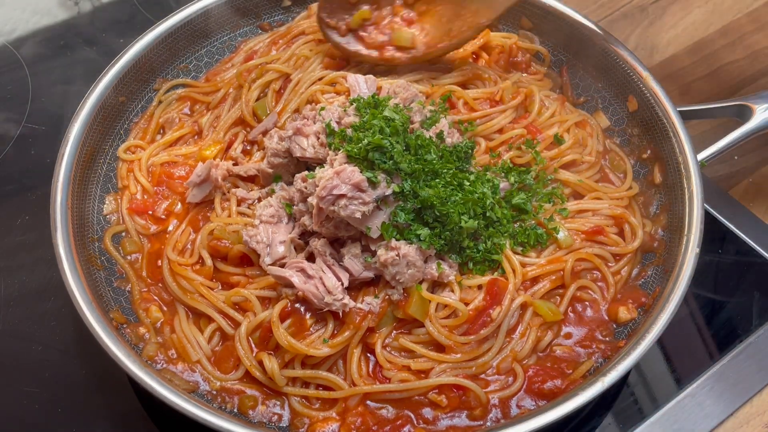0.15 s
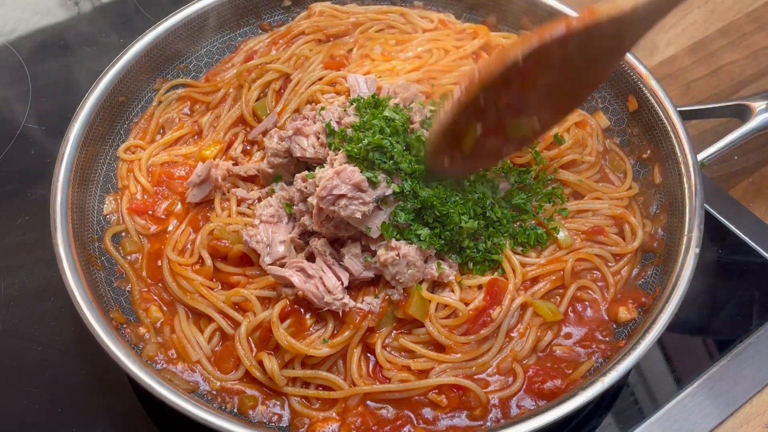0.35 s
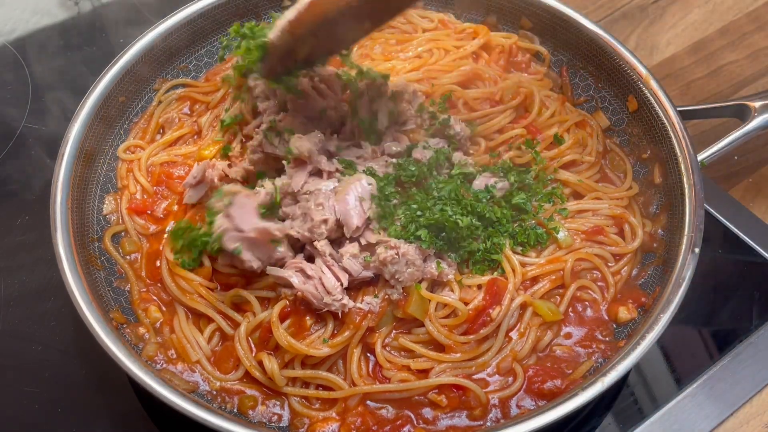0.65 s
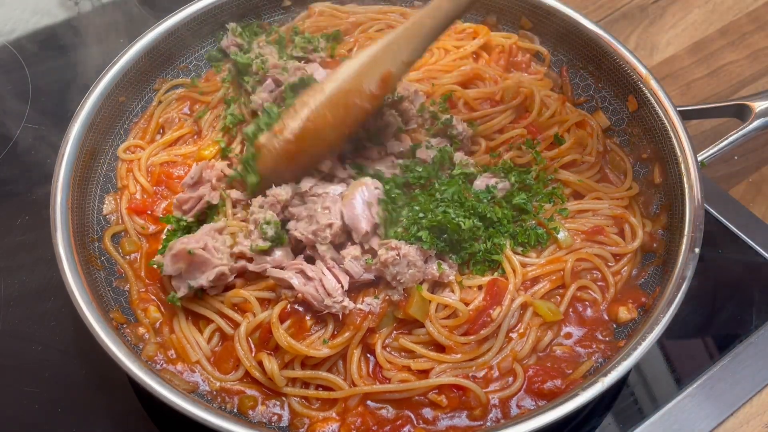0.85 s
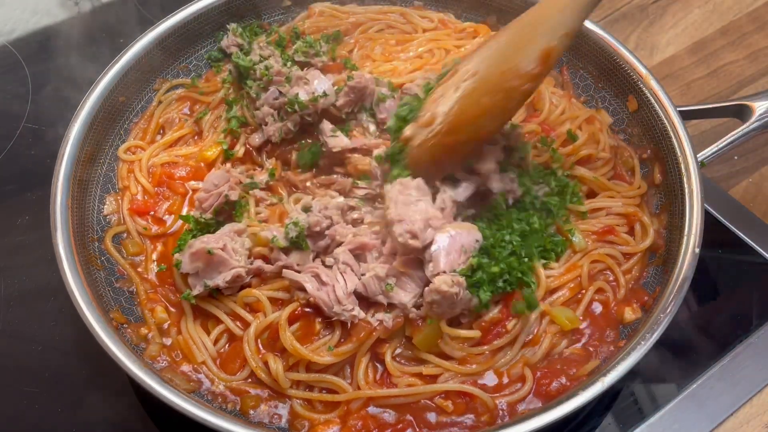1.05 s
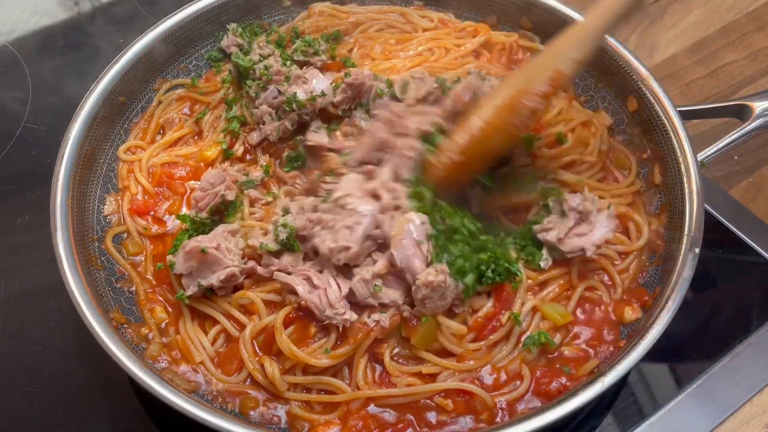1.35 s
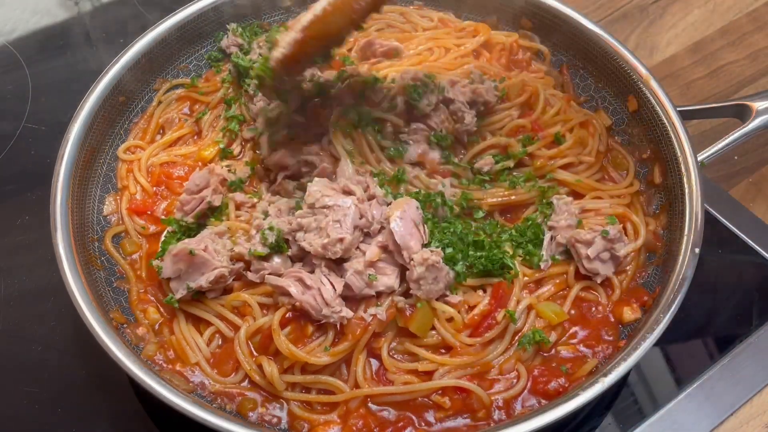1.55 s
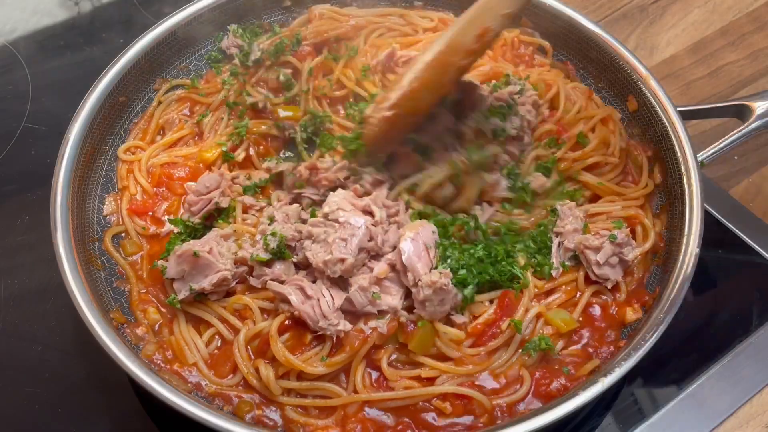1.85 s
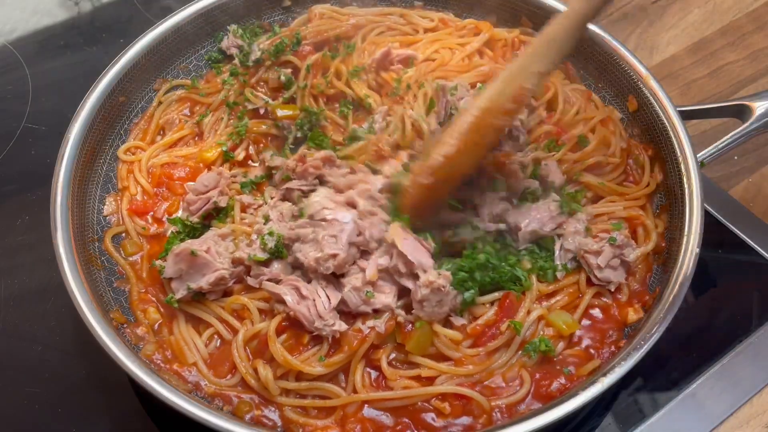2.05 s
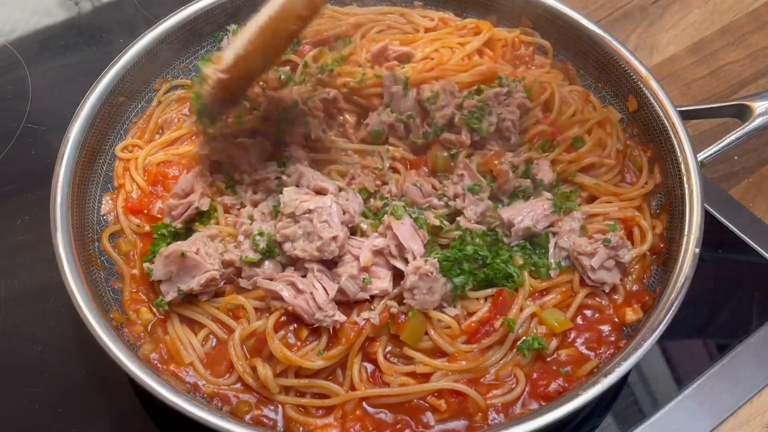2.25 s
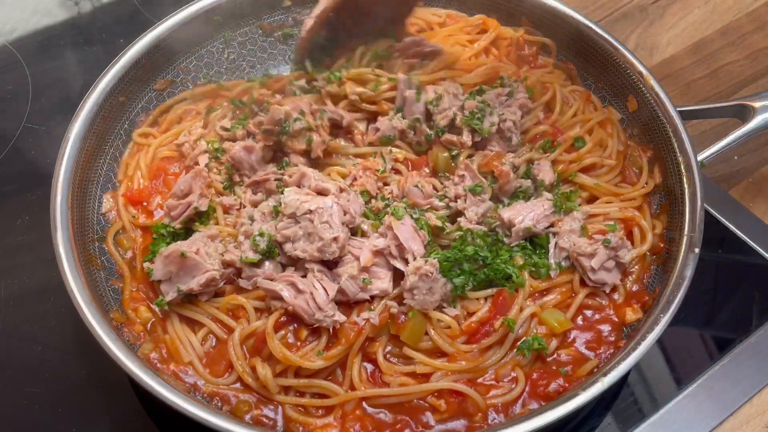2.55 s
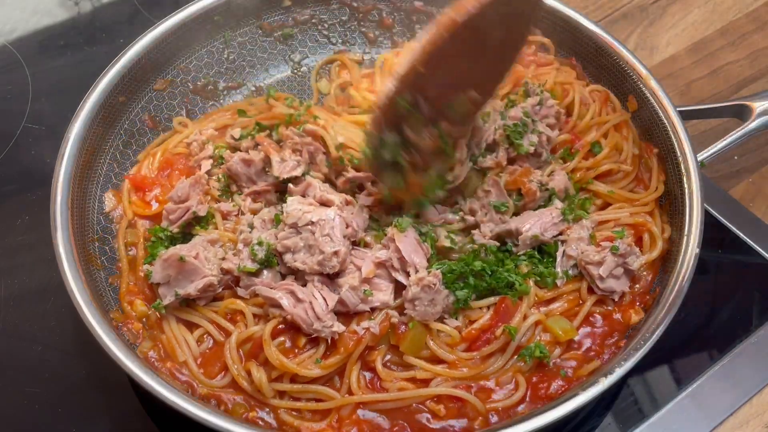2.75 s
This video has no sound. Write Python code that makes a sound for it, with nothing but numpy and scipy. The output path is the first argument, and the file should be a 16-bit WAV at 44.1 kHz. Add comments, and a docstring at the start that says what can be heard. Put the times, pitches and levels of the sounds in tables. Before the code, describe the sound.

Close up in a kitchen, pasta is stirred with wet, sticky strokes while the sauce sizzles and bubbles. A deep thump comes from the stove, followed by one sharp wooden knock that makes the metal pan ring.

```python
"""A wooden spoon stirs pasta in simmering sauce, in a steel pan on a glass hob.
The strokes squelch and the sauce hisses (both shaped noise), bubbles pop as tiny fading tones,
and sticky noodles smack. The hob rumbles, and shudders under a hard push. Once, the spoon knocks
the rim and the pan rings. A phone with two microphone ports hears it all from close by."""
import sys
import numpy as np
from scipy import signal
from scipy.fft import rfft, irfft, next_fast_len
from scipy.io import wavfile
from scipy.ndimage import uniform_filter1d, map_coordinates

SR = 44100
rng = np.random.default_rng(int(sys.argv[2]) if len(sys.argv) > 2 else 0)


def generate_wav(sig):
    """Save sig (samples, or channels by samples) to the path in sys.argv[1] as 16-bit PCM at SR."""
    pcm = np.round(np.clip(np.atleast_2d(sig).T, -1, 1) * 32767).astype(np.int16)
    wavfile.write(sys.argv[1], SR, pcm)


N = 127890


def amp(db):
    return 10 ** (np.asarray(db) / 20)


def unit(x):
    return x / np.sqrt(np.mean(x ** 2) + 1e-20)


def along(points, hz):
    """Read between (Hz, value) points on a log frequency scale."""
    f, v = np.transpose(points)
    return np.interp(np.log(hz + 1), np.log(f + 1), v)


def curves(rows):
    """One value per sample for each column after the time."""
    s, *cols = np.transpose(rows)
    return [np.interp(np.arange(N) / SR, s, c) for c in cols]


def wobble(rate):
    """A smooth curve through rate random values a second."""
    return map_coordinates(rng.standard_normal(int(N * rate / SR) + 4), [np.arange(N) * rate / SR])


def filtered(x, response):
    """Scale and shift each frequency of x by response(hz)."""
    m = next_fast_len(N + SR // 2)
    return irfft(rfft(x, m) * response(np.fft.rfftfreq(m, 1 / SR)), m)[..., :N]


def bursts(rows, shape):
    """A loudness curve with one copy of shape at each (seconds, dB) row."""
    hits = np.bincount([round(s * SR) for s, _ in rows], [amp(db) for _, db in rows], N)
    return np.convolve(hits, shape)[:N]


def fading_noise(table):
    """Stereo noise above 200 Hz; each frequency has its own fade time (time to drop 60 dB)."""
    f, db, t60 = np.transpose(table)
    hz, t, z = signal.stft(rng.standard_normal((2, SR // 2 + 256)), SR, nperseg=256)
    gain_db = along(np.c_[f, db], hz)[:, None] - 60 * t / along(np.c_[f, t60], hz)[:, None]
    return signal.istft(z * amp(gain_db) * (hz > 200)[:, None], SR, nperseg=256)[1][:, :SR // 2]


# How wide the noise sounds. Each row: frequency in Hz, side level over the middle in dB.
STEREO_WIDTH = [(60, -19), (130, -2.5), (250, -6.5), (700, -3), (1300, -5), (4400, -5), (8500, 1)]
def rush(spectrum, grit_db, spikes, patchy_db):
    """Patchy stereo noise of a set strength, made gritty by short spikes of loudness."""
    kicks = np.bincount(rng.integers(0, N, spikes), rng.exponential(1, spikes), N)
    grit = 1 + amp(grit_db) * np.convolve(kicks, np.exp(-np.arange(SR // 100) / (0.0016 * SR)))[:N]
    z = signal.stft(rng.standard_normal((2, N + 256)), nperseg=256)[2]
    patches = uniform_filter1d(rng.standard_normal(z.shape[1:]), size=5, axis=0)
    patches = uniform_filter1d(patches, size=8, axis=1)
    pair = signal.istft(z * amp(patchy_db * unit(patches)), nperseg=256)[1][:, :N]
    mid, side = filtered(grit * pair, lambda hz: amp(along(spectrum, hz)))
    side = filtered(side, lambda hz: amp(np.clip(along(STEREO_WIDTH, hz), -25, 0)))
    return np.array([mid + side, mid - side]) / np.std(mid)


def hollow_pan(hz, boost_db=14, width_hz=40):
    """The pan, damped by food, boosts sound near its own ringing notes."""
    damping = 1j * hz * width_hz
    peaks = sum(amp(db) * damping / (note ** 2 - hz ** 2 + damping) for note, db, *_ in PAN_NOTES[2:])
    return 1 + amp(boost_db) * peaks


# The spoon's strokes. Each row: time in seconds, then squelch, sizzle and fine hiss levels in dB.
STROKES = [(0, -60, -66, -68), (.3, -61.5, -62.5, -67), (.62, -57.5, -65.5, -65), (.76, -59.5, -61, -65.5),
           (.84, -58, -62.5, -63.5), (.89, -50.5, -62, -64.5), (.98, -53, -54, -59), (1.1, -55, -57.5, -60),
           (1.2, -62, -59.5, -59), (1.35, -55, -60, -61.5), (1.55, -62, -63.5, -65.5),
           (1.66, -53.5, -61.5, -63), (1.78, -52.5, -56.5, -58), (1.88, -56, -60.5, -61),
           (2.05, -59.5, -58.5, -57), (2.2, -62, -60.5, -60), (2.37, -65.5, -66, -66.5),
           (2.46, -47, -66.5, -65), (2.6, -53, -57, -59), (2.74, -57, -58.5, -56.5), (2.9, -61, -59, -60.5)]
# The tone of those three noises. Each row: frequency in Hz, relative level in dB.
SQUELCH_TONE = [(76, -43), (130, 1), (232, -3), (459, -3.5), (800, -5), (1400, -13.5), (3000, -19.5),
                (3900, -46), (6600, -120)]
SIZZLE_TONE = [(590, -60), (1000, -2), (2290, -4.5), (5040, -5), (5850, -9.5), (6610, -6.5), (8000, -16.5),
               (10400, -46), (17600, -120)]
HISS_TONE = [(6500, -42), (8000, 8), (10000, -1), (13000, 0.5), (16000, 1.5)]
def stirring():
    """The sauce squelches, sizzles and hisses, swelling unevenly with each stroke."""
    squelch_db, sizzle_db, hiss_db = curves(STROKES)
    lumps = wobble(18)
    wet = rush(SQUELCH_TONE, grit_db=-6.5, spikes=200, patchy_db=1.5)
    squelch = amp(squelch_db + .7 * lumps) * unit(filtered(wet, hollow_pan))
    sizzle = amp(sizzle_db + .75 * lumps) * rush(SIZZLE_TONE, grit_db=-6.5, spikes=600, patchy_db=2)
    hiss = amp(hiss_db + .8 * lumps) * rush(HISS_TONE, grit_db=1.5, spikes=250, patchy_db=1.2)
    return squelch + sizzle + hiss


# The rumble's loudness. Each row: time in seconds, level in dB.
RUMBLE_LEVELS = [(0, -65), (.07, -58), (.22, -60.5), (.4, -63), (.7, -58.5), (.94, -63.5), (1.0, -52),
                 (1.08, -58.5), (1.15, -60), (1.3, -61), (1.54, -62.5), (1.65, -50), (1.78, -43.5),
                 (1.95, -56), (2.2, -63.5), (2.33, -54), (2.54, -57), (2.77, -59.5), (2.9, -63)]
# Its tone. Each row: frequency in Hz, relative level in dB.
RUMBLE_TONE = [(12, -87), (20, -10.5), (64, 2), (77, 0.5), (97, -6), (160, -12.5), (350, -98)]
def hob_rumble():
    """The hob gives a low, lumpy rumble."""
    level_db, = curves(RUMBLE_LEVELS)
    return amp(level_db + 1.7 * wobble(8.82)) * rush(RUMBLE_TONE, grit_db=-21, spikes=10, patchy_db=-.5)


def bubbles(rows, cycles, port_lag_s=57e-6):
    """Each bubble rings for a few cycles, rising slightly, and reaches the left port first."""
    out, t = np.zeros((2, N + SR)), np.arange(SR // 25) / SR
    for s, db, hz, left_db in rows:
        age = t * hz / cycles
        swell = np.e * 4 * age * np.exp(-4 * age)
        tone = swell * np.sin(2 * np.pi * hz * t * (1 + 0.018 * age))
        out[:, round(s * SR):][:, :len(t)] += amp(db + np.array([[left_db], [-left_db]]) / 2) * tone
    return filtered(out[:, :N], lambda hz: np.exp(1j * np.pi * hz * port_lag_s * np.array([[1], [-1]])))


def fizz():
    """Tiny bubbles burst at random, louder when the sizzle is louder."""
    when, softness, pitch, lean = rng.random((160, 4)).T
    starts = when * (N - 1) / SR
    _, sizzle_db, _ = curves(STROKES)
    peak_db = sizzle_db[(starts * SR).astype(int)] + 7.5 - 0.56 * np.log(softness + 0.11)
    return bubbles(zip(starts, peak_db, 1500 * 9 ** pitch, 3 * lean), cycles=5.1)


# Bursting bubbles. Each row: start in seconds, peak in dB, pitch in Hz, left over right in dB.
BUBBLE_POPS = [(0.041, -47, 11900, 21), (0.1156, -39, 3500, 8), (0.545, -46, 13500, 19),
               (0.754, -33, 7200, 0), (0.831, -40.5, 6100, 15.5), (.868, -44, 14000, 3),
               (1.281, -34.5, 5370, 0.5), (1.377, -47, 3690, 7), (1.4092, -45, 3710, 6),
               (1.4925, -40, 5860, 11), (1.7035, -42, 9400, 20.5), (1.76, -46, 14500, 3),
               (1.9366, -45.5, 2300, .6), (1.988, -43, 13200, 3), (2.0142, -49, 1720, 1.5),
               (2.0374, -40.5, 6500, 11), (2.481, -40.5, 13200, -19), (2.5007, -43.5, 3930, 11.5),
               (2.5236, -49, 3640, 11), (2.795, -53, 3500, 13)]
# The tone of their splats. Each row: frequency in Hz, relative level in dB.
SPLAT_TONE = [(400, -1), (2000, -10), (6000, 4), (15000, -9)]
def pops(splat_db=-16, fade_s=0.03):
    """A bubble pops with a high ping and a short, noisy splat."""
    fade = amp(-60 * np.arange(SR // 20) / SR / fade_s)
    loudness = bursts([(s, db + splat_db) for s, db, *_ in BUBBLE_POPS], fade)
    splats = loudness * rush(SPLAT_TONE, grit_db=-30, spikes=10, patchy_db=3)
    return bubbles(BUBBLE_POPS, cycles=6.6) + splats


# Low bubbles. Each row: start in seconds, peak in dB, pitch in Hz.
BUBBLE_PLOPS = [(.878, -47, 480), (.94, -46.5, 348), (1.025, -46, 440), (1.094, -45, 495),
                (1.577, -49, 480), (1.635, -51, 746), (1.938, -43.5, 480), (1.992, -48, 480),
                (2.299, -50, 740)]
def plops():
    """Low bubbles die away after about two cycles, so they sound dull."""
    return bubbles([(*row, 0) for row in BUBBLE_PLOPS], cycles=2.26)


# Noodle smacks. Each row: start in seconds, level at its loudest in dB.
NOODLE_SMACKS = [(.975, -53), (1.028, -47.5), (1.095, -49), (1.224, -51.5), (1.234, -58), (1.76, -57),
                 (1.8983, -52.5), (1.9377, -51), (1.9924, -51), (2.064, -49)]
# Their tone. Each row: frequency in Hz, relative level in dB.
SMACK_TONE = [(300, -30), (700, -6.5), (2300, -1.5), (4500, -3), (6500, -13), (12000, -40)]
def noodles(rise_s=0.0016):
    """Sticky noodles tear off the spoon in quick puffs of noise."""
    age = np.arange(SR // 30) / SR / rise_s
    loudness = bursts(NOODLE_SMACKS, age * np.exp(1 - age))
    return loudness * rush(SMACK_TONE, grit_db=-30, spikes=10, patchy_db=1)


# The shaking glass. Each row: time in seconds, pitch in Hz, level in dB.
GLASS_SHUDDER = [(1.55, 81.4, -86), (1.6, 81.5, -50), (1.644, 80.7, -33.5), (1.78, 69.5, -49.5),
                 (1.854, 57.1, -53), (2.166, 56.1, -54.5), (2.24, 50.5, -90)]
def hob_shudder():
    """A hard push makes the glass shudder at a sinking pitch, with weak overtones."""
    pitch, level_db = curves(GLASS_SHUDDER)
    phase = 2 * np.pi * np.cumsum(pitch) / SR
    overtones = amp(-19.5 + 3.1 * wobble(19)) * np.sin(2.2 * phase)
    overtones += amp(-11 + 3.5 * wobble(30.75)) * np.sin(1.3 * phase)
    return np.sqrt(2) * amp(level_db + wobble(25)) * (np.sin(phase) + overtones)


def ringing(t, hz, db, fade_s, rise_s, phase):
    """One note of a struck object: it swells quickly, then fades."""
    loudness = amp(db - 60 * t / fade_s) * (1 - np.exp(-t / rise_s)) ** 2
    return loudness * np.sin(2 * np.pi * hz * t + phase)


# The steel pan's notes. Each row: pitch in Hz, relative level in dB, fade and rise times in seconds.
PAN_NOTES = [(162, -20.5, 0.37, 0.0037), (213.2, -13, 0.19, 0.0027), (280.6, -22.5, 0.35, 0.0053),
             (319.7, -17.5, 0.24, 0.0067), (448, -11, 0.092, 0.0017), (634, -18, 0.16, 0.0017),
             (783.4, -13.5, 0.071, 0.0026), (1020, -29.5, 0.17, .002), (3176, -33.5, 0.069, .001),
             (1185, -20, 0.35, 0.0094), (1758, -28.5, 0.34, 0.009), (2117, -26.5, 0.26, 0.0015),
             (2543, -29.5, 0.18, 0.0015)]
def pan_ring(t):
    """The struck pan rings unsteadily, a little differently left and right."""
    ring = 0
    for hz, *shape in PAN_NOTES:
        flutter = amp(1.5 * wobble(45)[:len(t)])
        phases = rng.normal(0, .2 if hz < 250 else .5, (2, 1))
        ring += flutter * ringing(t, hz, *shape, phases)
    return ring


# The pan's clatter. Each row: frequency in Hz, relative level in dB, fade time in seconds.
PAN_CLATTER = [(149, 3, 0.92), (396, -3.5, 0.2), (800, -3, 0.24), (1530, -5.5, 0.16), (3060, -24, 0.14),
               (12000, -32.5, 0.035)]
# The hob's boom; the two closest notes throb together.
# Each row: pitch in Hz, level in dB, fade and rise times in seconds, phase in radians.
HOB_NOTES = [(64.6, -25, 0.35, 0.0034, np.pi), (76.2, -19.5, 0.31, 0.014, 0), (115.8, -30, 0.47, 0.017, 0)]
def rim_knock(start_s=2.3965, boom_lag_s=0.0039, wood_hz=1104, rise_s=0.00047, wood_fade_s=0.0037):
    """The wood clacks, the pan rings and clatters, and the hob booms a moment later."""
    out, t = np.zeros((2, N + SR)), np.arange(SR // 2) / SR
    wood_tone = np.sin(2 * np.pi * wood_hz * t * (1 - 55 * t))  # the pitch drops fast
    clack = (t / rise_s) ** 4 * amp(-60 * t / wood_fade_s) * wood_tone
    clack = clack / np.abs(clack).max() * amp([[1], [-1]])  # a bit louder on the left
    ring = pan_ring(t)
    mid, side = amp(-5) * fading_noise(PAN_CLATTER) * (1 - np.exp(-t / rise_s))
    clatter = np.array([mid + 1.2 * side, mid - 0.84 * side])
    boom = sum(ringing(t, *row) for row in HOB_NOTES)
    out[:, round(start_s * SR):][:, :len(t)] += amp(-11.5) * (clack + ring + clatter)
    out[:, round((start_s + boom_lag_s) * SR):][:, :len(t)] += boom
    return out[:, :N]


# The room's echo. Each row: frequency in Hz, relative level in dB, fade time in seconds.
KITCHEN_ECHO = [(150, 4, 0.37), (1000, -2, 0.46), (4000, -8, 0.75), (12000, -5, 0.36)]
def kitchen(x, level_db=-10.5):
    """The room answers a moment later with a fading echo, one for each port."""
    tail = fading_noise(KITCHEN_ECHO)
    delayed = np.pad(x, ((0, 0), (200, 0)))
    return amp(level_db) * signal.fftconvolve(delayed, tail / np.linalg.norm(tail[0]), axes=1)[:, :N]


def scene():
    """Sauce, hob and knock together; only the knock echoes."""
    knock = rim_knock()
    sauce = stirring() + fizz() + pops() + plops() + noodles()
    return sauce + hob_rumble() + hob_shudder() + knock + kitchen(knock)


def record(dry, dip_hz=(8000, 9390), mono_above_hz=12100, edge_hz=970, top_hz=15850):
    """The middle dips in one treble band; higher up the sound narrows to mono, then ends at top_hz."""
    above = lambda hz, corner: np.clip((hz - corner) / edge_hz + .5, 0, 1)
    in_band = lambda hz: above(hz, dip_hz[0]) - above(hz, dip_hz[1])
    mid = filtered(dry.mean(0), lambda hz: amp(-26.5 * in_band(hz)) * (hz < top_hz))
    side = filtered((dry[0] - dry[1]) / 2, lambda hz: amp(-30 * above(hz, mono_above_hz)) * (hz < top_hz))
    return np.array([mid + side, mid - side])


dry = scene()
out = record(dry)
generate_wav(out)
```